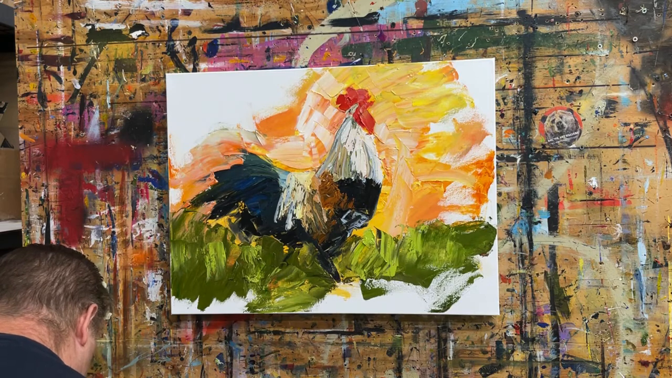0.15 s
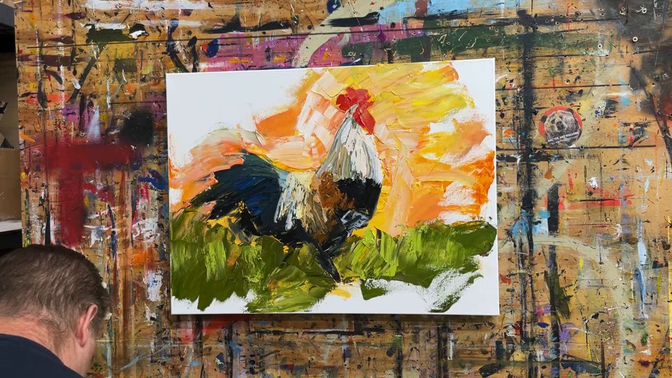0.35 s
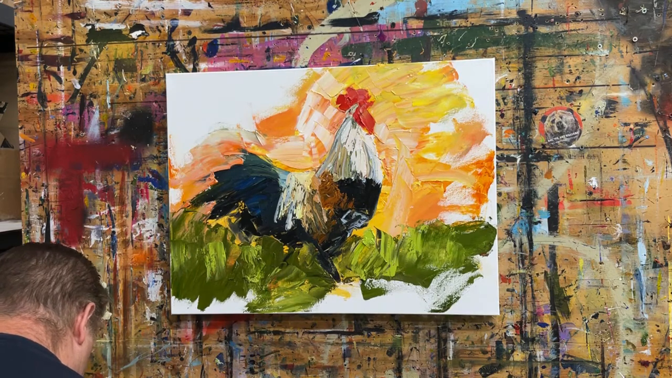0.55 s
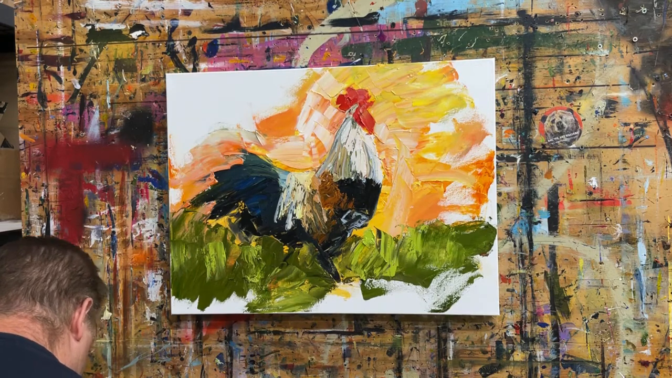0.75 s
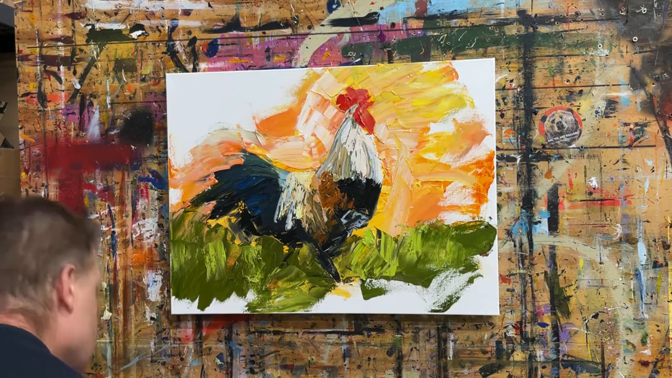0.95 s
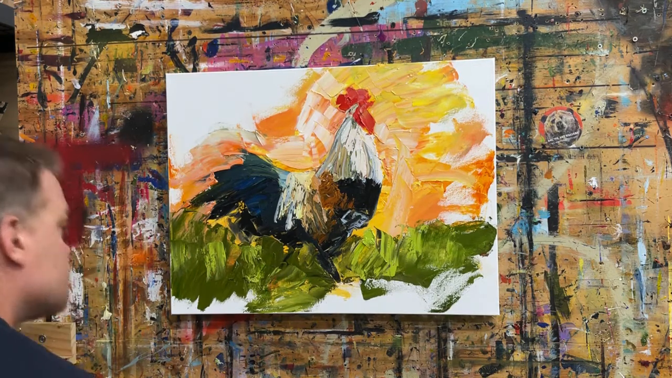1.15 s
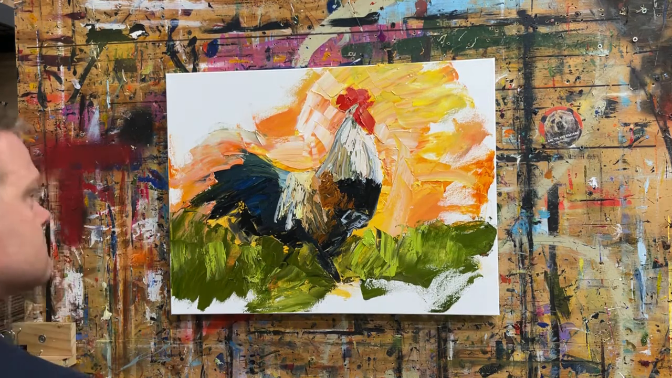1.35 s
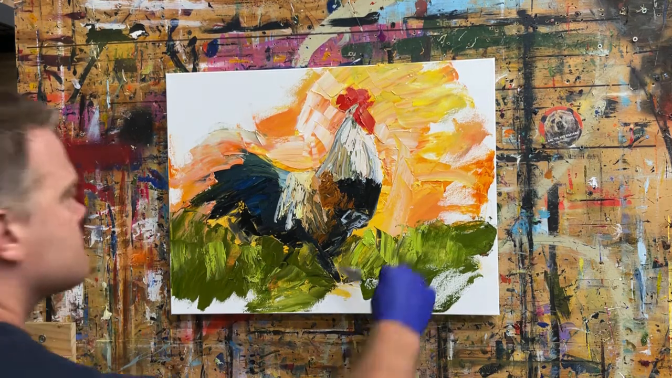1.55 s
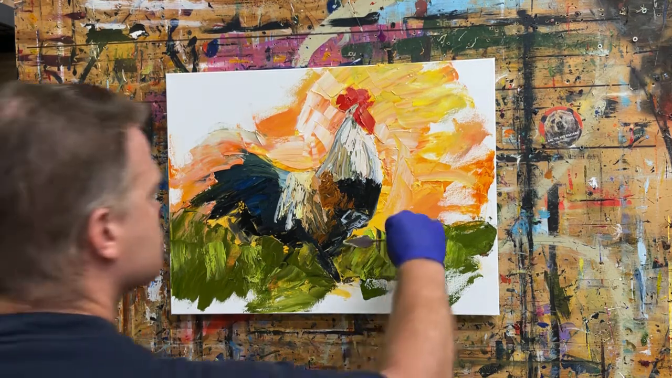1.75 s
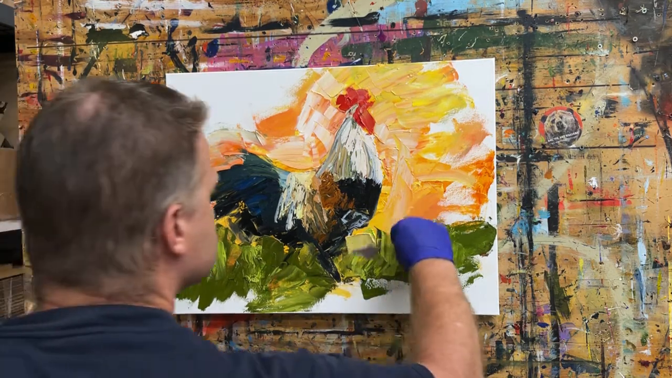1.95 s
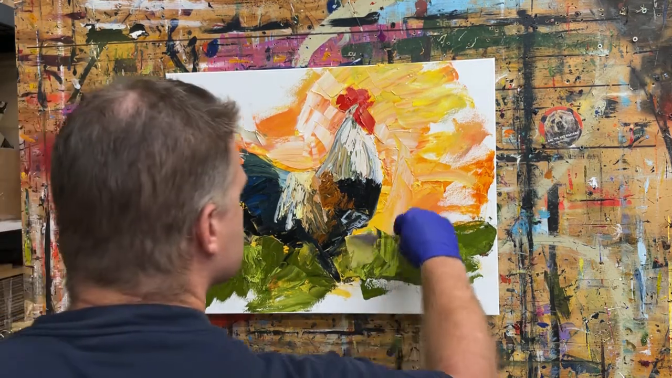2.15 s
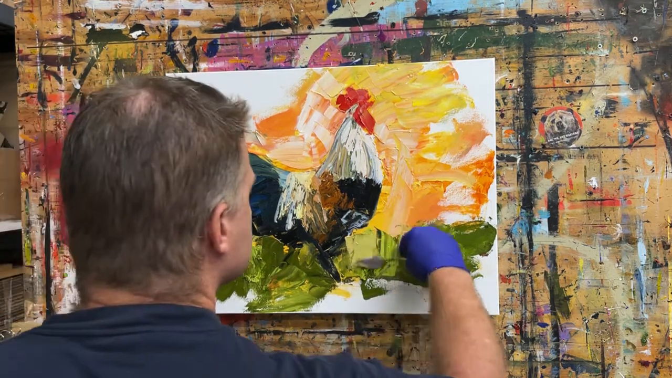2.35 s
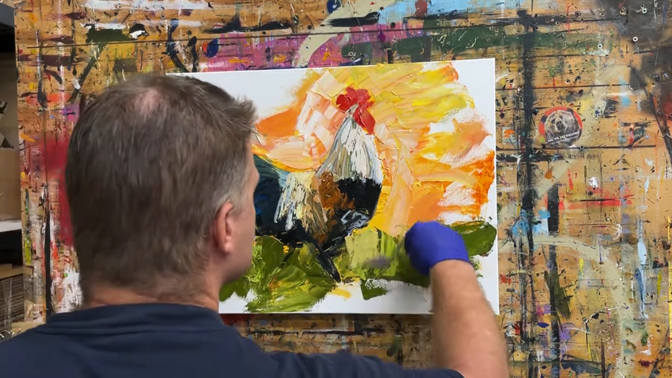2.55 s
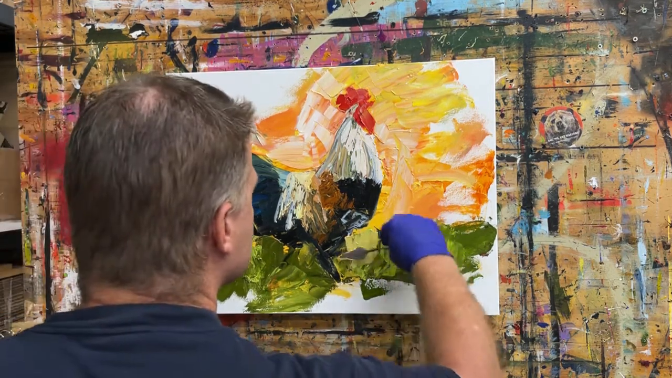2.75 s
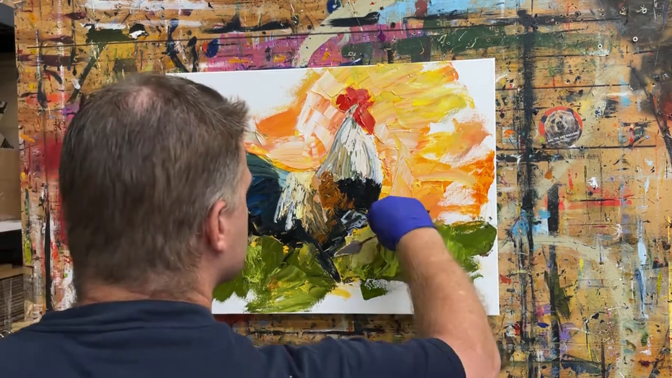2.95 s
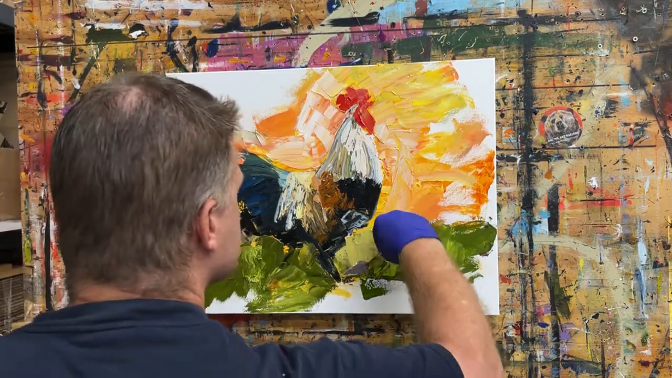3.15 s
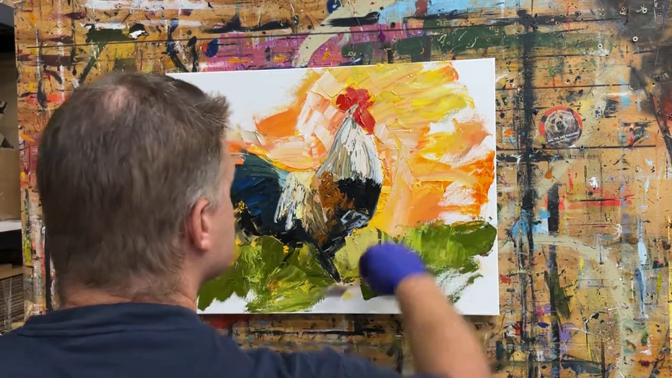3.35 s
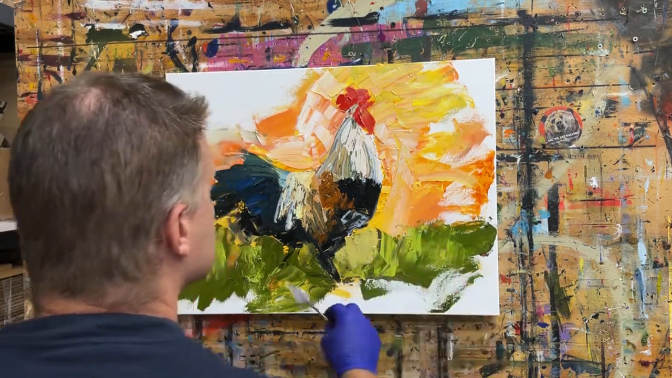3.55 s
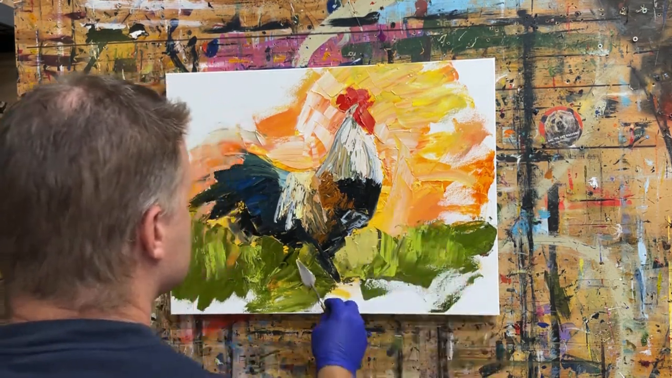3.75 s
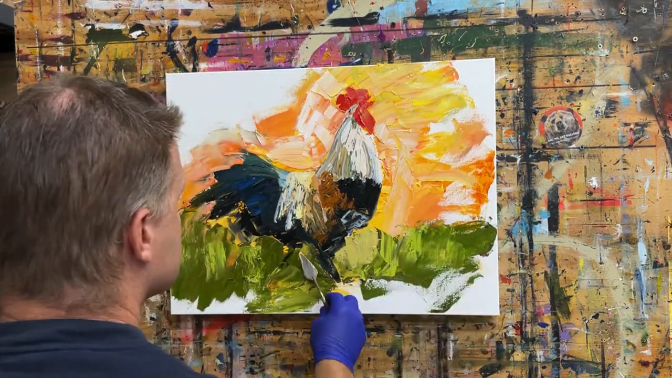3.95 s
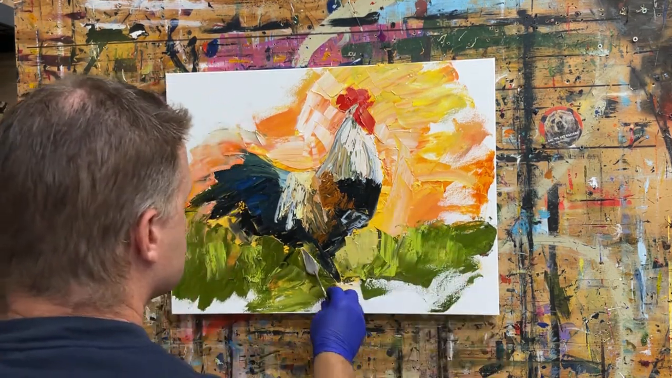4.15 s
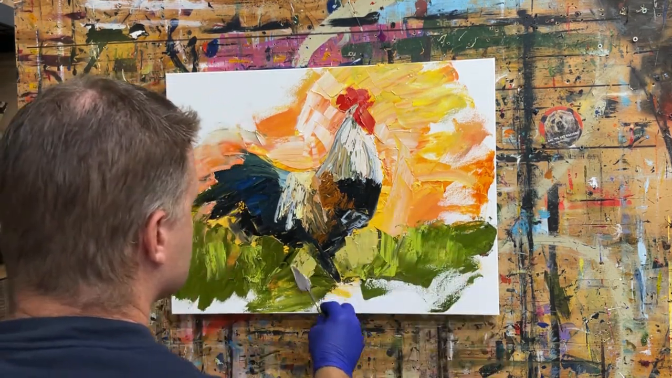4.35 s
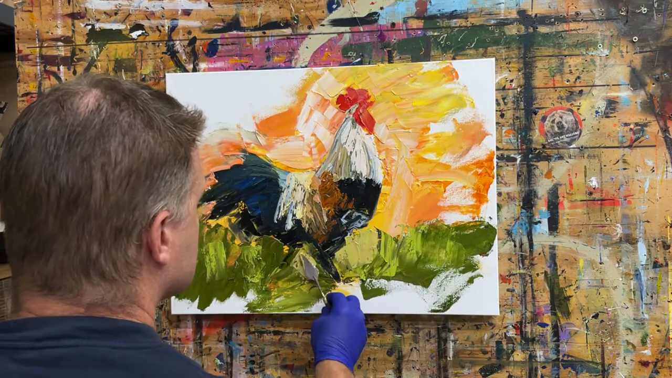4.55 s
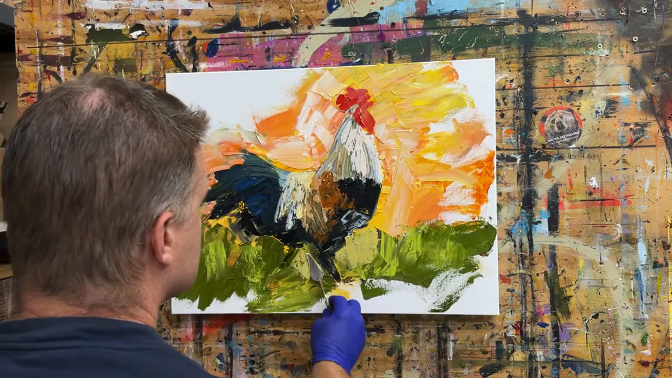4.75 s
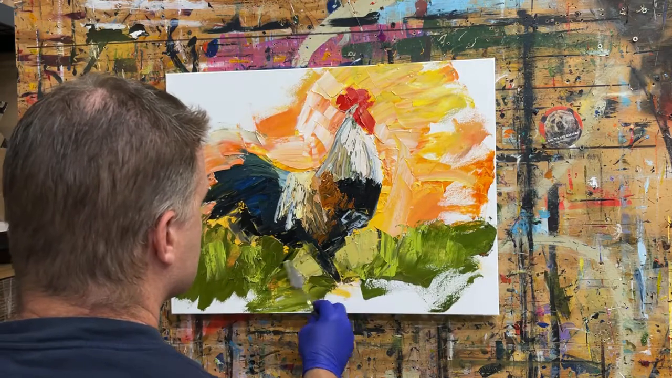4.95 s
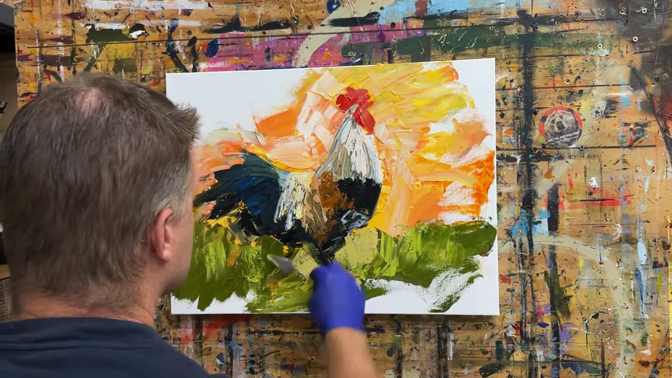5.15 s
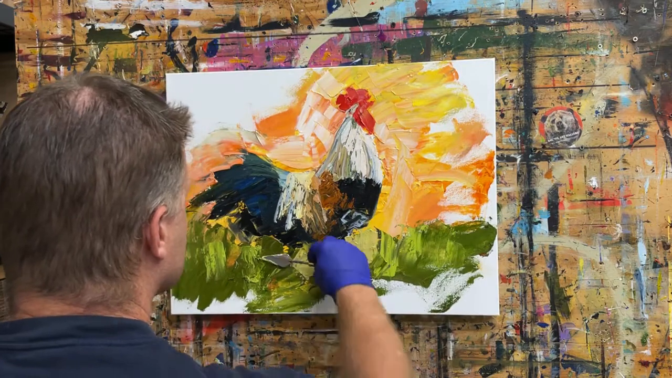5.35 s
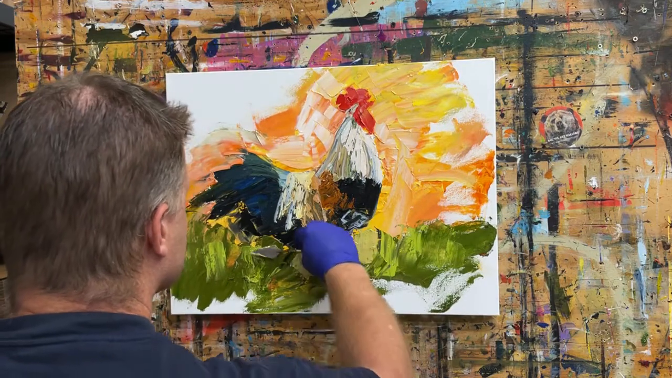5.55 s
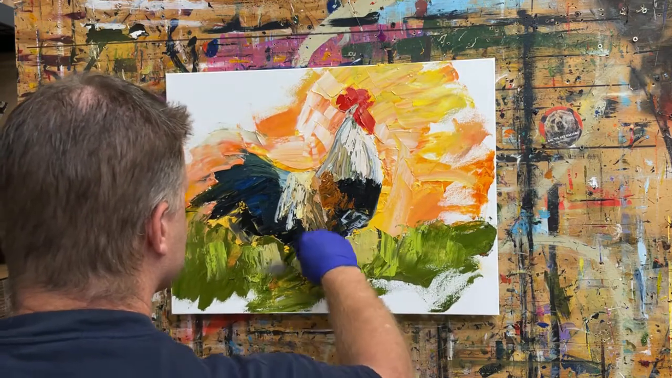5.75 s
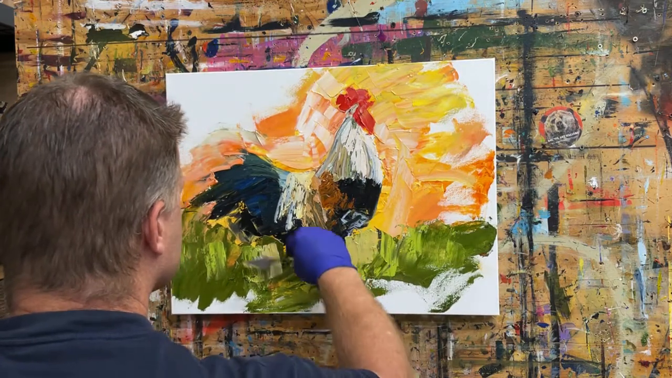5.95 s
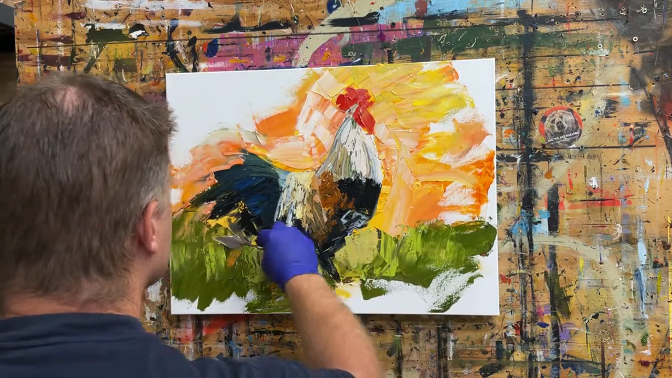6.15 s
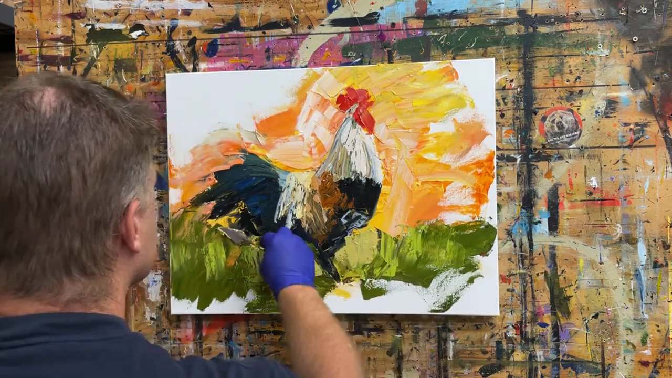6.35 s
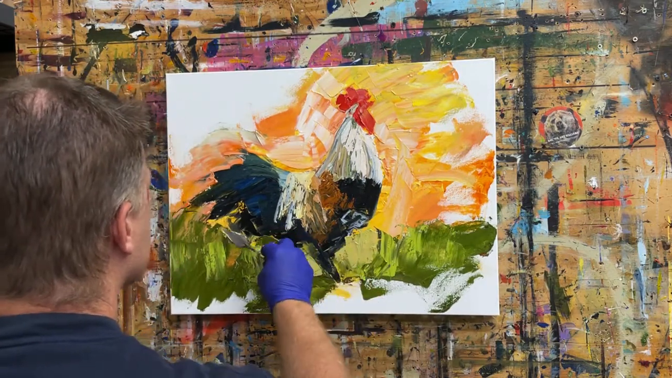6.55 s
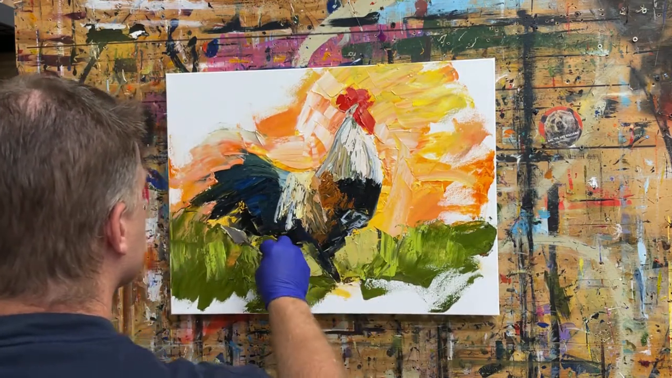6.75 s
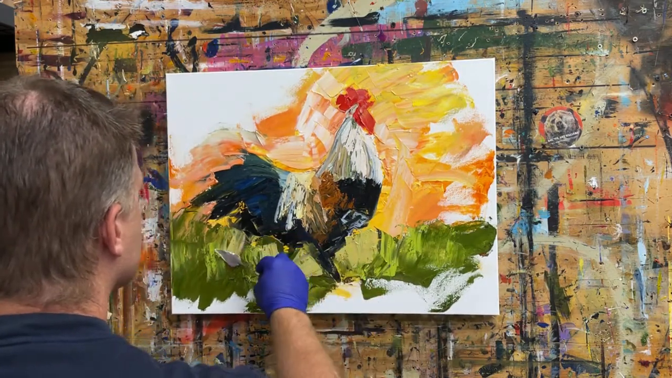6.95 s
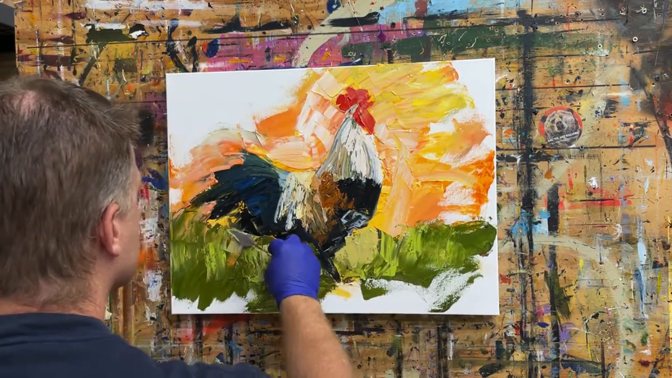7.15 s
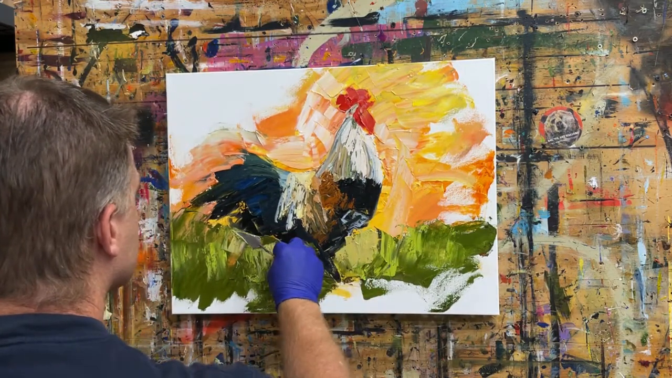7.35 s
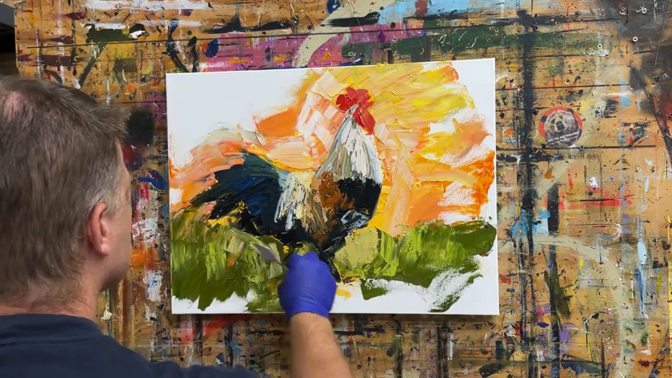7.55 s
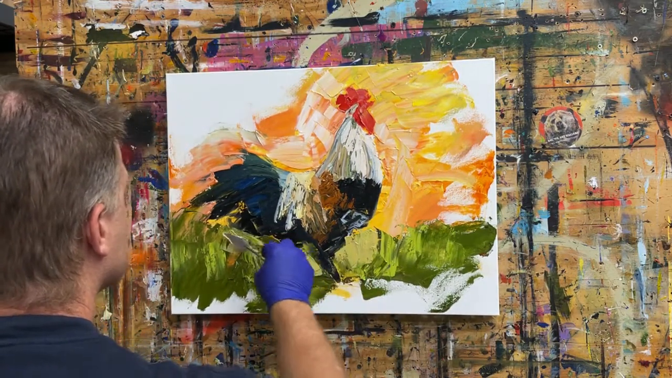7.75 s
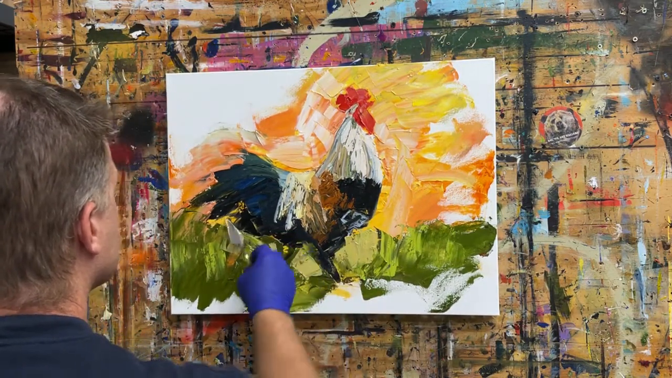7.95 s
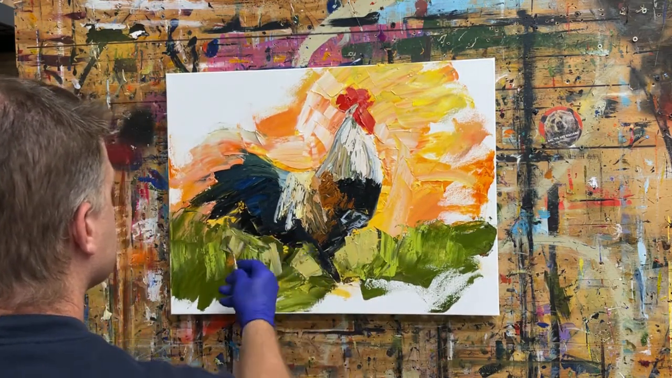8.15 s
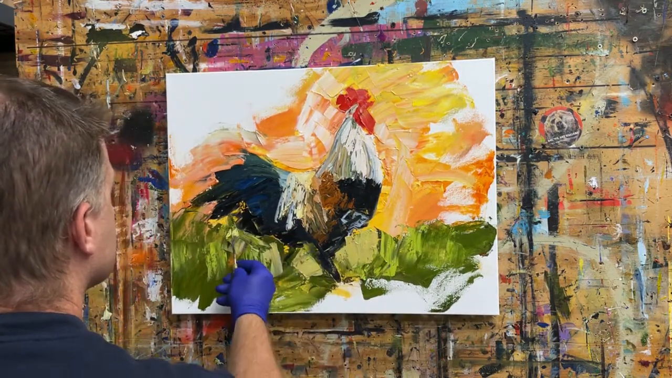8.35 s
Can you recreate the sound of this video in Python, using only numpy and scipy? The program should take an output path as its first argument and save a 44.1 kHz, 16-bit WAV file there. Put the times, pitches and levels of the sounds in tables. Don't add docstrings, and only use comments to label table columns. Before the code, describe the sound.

Soft, irregular muffled thumps on a taut canvas, with sparse dry clicks and faint sticky scrapes in a quiet studio with ventilation rumble.

```python
import sys
import numpy as np
from scipy import signal
from scipy.fft import rfft, irfft, next_fast_len
from scipy.io import wavfile
from scipy.ndimage import map_coordinates

SR = 44100
rng = np.random.default_rng(int(sys.argv[2]) if len(sys.argv) > 2 else 0)


def store_pcm(level_fs):
    pcm = np.round(np.clip(level_fs, -1, 1) * 32767).astype(np.int16)
    wavfile.write(sys.argv[1], SR, np.atleast_2d(pcm).T)


def nominal_scale(level):
    x = np.asarray(level, float) / 20
    return 10 ** x


N = 369858

# start_s, ring_db, contact_brightness_hz, first_swing_db
DABS = [(1.88, -22.5, 510, -23), (2.237, -26, 432, -27), (2.512, -29, 417, -29), (2.998, -26.5, 495, -25.5),
        (4.131, -27, 413, -27.5), (4.737, -24.5, 473, -25.5), (5.667, -27, 373, -36),
        (5.692, -31.5, 300, -33.5), (6.782, -29.5, 418, -37), (6.8172, -34, 338, -31.5),
        (7.315, -38, 416, -48.5), (7.339, -49, 343, -38), (8.205, -50.5, 1110, -61),
        (8.318, -40.5, 372, -38.5)]


def unit(x):
    return x / np.sqrt(np.mean(x ** 2) + 1e-20)


def along(points, hz):
    f, v = np.transpose(points)
    return np.interp(np.log(hz + 1), np.log(f + 1), v)


def wobble(rate):
    knots = rng.standard_normal(int(N * rate / SR) + 4)
    return map_coordinates(knots, [np.arange(N) * rate / SR])


def filtered(x, response):
    m = next_fast_len(x.shape[-1] + 8192)
    spectrum = rfft(x, m) * response(np.fft.rfftfreq(m, 1 / SR))
    return irfft(spectrum, m)[..., :x.shape[-1]]


def band(centre_hz, width_hz):
    return lambda f: (1j * f * width_hz / (centre_hz ** 2 - f * f + 1j * f * width_hz)) ** 2


def add(track, s, sound):
    part = track[..., round(s * SR):][..., :sound.shape[-1]]
    part += sound[..., :part.shape[-1]]


def rush(spectrum):
    # frequency_hz, likeness (0 to 1)
    likeness = [(30, 1), (150, 0.94), (400, 0.54), (1000, 0.15), (3000, 0.11), (12000, 0.21)]

    def shape(hz):
        turn = np.arccos(np.clip(along(likeness, hz), -1, 1)) / 2
        return nominal_scale(along(spectrum, hz)) * [np.cos(turn), np.sin(turn)]

    mid, side = filtered(rng.standard_normal((2, N)), shape)
    return unit(np.array([mid + side, mid - side]))


def air():
    # time_s, level_db
    strength = [(0.0, -58.5), (0.35, -53.5), (0.65, -61), (1.03, -56), (1.38, -56.5), (1.92, -56.5),
                (2.57, -53.5), (3.48, -57.5), (3.76, -54), (4.13, -56.5), (4.6, -56.5), (4.76, -48.5),
                (5.09, -57), (5.79, -52.5), (6.0, -54.5), (6.8, -55), (7.05, -54.5), (8.39, -57)]
    # frequency_hz, density_db (per Hz)
    rumble_spectrum = [(8.8, -54.5), (15, -22.5), (22, -22), (35, -10), (49, -6.5), (65, -1.5), (130, -13),
                       (170, -49), (290, -120)]
    # frequency_hz, density_db (per Hz)
    draught_spectrum = [(59, -31.5), (100, 0.5), (273, -9), (297, -14.5), (422, -19.5), (443, -37),
                        (482, -16), (512, -38.5), (537, -25), (614, -30.5), (736, -32), (903, -40.5),
                        (1800, -62.5), (2340, -56), (3960, -120)]
    # frequency_hz, density_db (per Hz)
    hiss_spectrum = [(500, -42.5), (1200, -1), (2500, -7.5), (5000, -11), (9000, -13), (12000, -15.5),
                     (16500, -3.5), (20000, -48)]
    rumble_db = np.interp(np.arange(N) / SR, *np.transpose(strength))
    rumble = nominal_scale(rumble_db + 2.5 * wobble(12)) * rush(rumble_spectrum)
    draught_db = -59 + 0.16 * (rumble_db - rumble_db.mean())
    draught = nominal_scale(draught_db + 1.5 * wobble(5)) * rush(draught_spectrum)
    return rumble + draught + nominal_scale(-90) * rush(hiss_spectrum)


def snaps():
    # start_s, crack_db, middle_db, knock_db, length_s
    breakages = [(.034, -60, -82, -70, 0.0078), (.059, -64, -61, -63, 0.0041),
                 (.102, -83, -54.5, -68, 0.008), (.440, -32, -47, -68, 0.0058),
                 (.665, -75, -51, -58, 0.011), (.725, -88, -48.5, -48, 0.021), (.892, -79, -38, -54, 0.036),
                 (.947, -41, -38.5, -56, 0.0058), (2.027, -60, -39, -41, .0076),
                 (2.546, -67, -41, -46, 0.0073), (3.571, -33, -41.5, -75, 0.0027),
                 (4.329, -47.5, -49, -42.5, 0.005), (5.063, -65, -86, -80, 0.0032),
                 (5.834, -39, -48, -36.5, 0.0022), (6.706, -86, -79, -65, .003),
                 (6.959, -66.5, -53.5, -39, .004), (7.194, -88, -82, -60, .003),
                 (7.535, -53, -57, -67.5, 0.0029), (7.553, -36, -47, -50.5, .0042),
                 (7.559, -29.5, -28.5, -35.5, 0.0042), (7.593, -70, -57, -54, 0.0031)]
    touch_db, touch_s = (-37.5, -41, -31.5), .003
    pan_db, knock_lag_s = -3.5, .0015
    out, knocks, t = np.zeros((2, N)), np.zeros(N), np.arange(SR // 10) / SR
    sweep = 2 * np.pi * (310 * t + 420 * .003 * (1 - np.exp(-t / 0.003)))
    knock = np.sin(sweep) * nominal_scale(-60 * t / 0.022) * (1 - np.exp(-t / 0.0014)) ** 2
    touches = [(s, *np.add(db, touch_db), touch_s) for s, db, *_ in DABS]
    for s, crack_db, middle_db, knock_db, length_s in breakages + touches:
        breaks = 0.22 * rng.standard_normal(len(t)) * np.exp(-2 * t / length_s)
        breaks[0] = .6
        crack = nominal_scale(crack_db) * filtered(breaks, band(10800, 15000))
        tick = nominal_scale(middle_db) * filtered(breaks, band(1500, 2800))
        add(out, s, (crack - tick) * nominal_scale([[pan_db / 2], [-pan_db / 2]]))
        add(knocks, s + knock_lag_s, nominal_scale(knock_db + 4) * knock)
    return out, knocks


def effort(t, swell_s, hold_s, fade_db_per_s):
    return nominal_scale(-18 * np.maximum(-t, 0) / swell_s - fade_db_per_s * np.maximum(t - hold_s, 0))


def rubs():
    # peak_s, swell_s, hiss_db, scrape_db, scrape_hz
    strokes = [(.73, .02, -86, -70, 2780), (.8, 0.014, -75.5, -78, 2180), (0.901, 0.02, -67, -62, 2080),
               (0.946, 0.034, -62, -77, 2600), (1.136, 0.033, -101, -82.5, 2470),
               (1.2, 0.086, -97, -72, 3300), (1.262, 0.11, -70, -66.5, 1720),
               (2.038, 0.059, -87, -75.5, 1800), (2.55, 0.021, -77, -83, 2400),
               (3.097, 0.039, -69.5, -63.5, 2340), (3.336, 0.058, -82.5, -78, 1370),
               (5.746, 0.008, -69, -66, 2770), (6.842, 0.03, -73.5, -72.5, 1830),
               (6.96, .02, -95, -76, 1500), (7.336, 0.012, -81, -80, 1390), (7.575, 0.022, -73, -58, 1190),
               (8.226, 0.07, -91, -71, 610), (8.337, 0.046, -90, -94, 1800)]
    smear_hiss_db, smear_scrape_db, smear_hz = -51.5, -50.5, 1500
    smear_swell_s, smear_hold_s = 0.0039, 0.042
    hiss_fade, scrape_fade = 333, 217
    peel_speed = 2.2
    clumps = nominal_scale(1.2 * wobble(70) + 3.5 * wobble(400))
    grains = np.pad(clumps * rng.standard_normal(N), SR)
    out, t = np.zeros(N + SR), np.arange(-SR // 4, SR // 3) / SR

    def bright(f):
        return band(8800, 7000)(f) + nominal_scale(4.5) * band(5700, 320)(f)

    smears = [(s, smear_swell_s, smear_hold_s, 1, db + smear_hiss_db, db + smear_scrape_db, smear_hz)
              for s, db, *_ in DABS]
    peels = [(s, swell_s, 0, peel_speed, *rest) for s, swell_s, *rest in strokes]
    for s, swell_s, hold_s, fast, hiss_db, scrape_db, hz in smears + peels:
        piece = grains[round((s + 1 + t[0]) * SR):][:len(t)]
        hiss = nominal_scale(hiss_db) * unit(filtered(piece, bright))
        hiss = hiss * effort(t, swell_s, hold_s, fast * hiss_fade)
        scrape = nominal_scale(scrape_db) * unit(filtered(piece, band(hz, 1.13 * hz)))
        scrape = scrape * effort(t, swell_s, hold_s, fast * scrape_fade)
        add(out, s + t[0], nominal_scale(-7.5) * (hiss + scrape))
    return out[:N]


def dabs():
    # frequency_hz, level_db, t60_s
    canvas_modes = [(71.6, -6.5, 0.12), (108.9, -19.5, 0.23), (136.4, -6, 0.053), (155, -15, 0.16),
                    (191, -18, 0.28), (240.2, -8.5, 0.17), (289, -7.5, 0.16), (371, -2, 0.099),
                    (421.6, -2, 0.072), (519.6, -13, 0.24), (560.2, -13, 0.14), (626.7, -11.5, 0.093),
                    (769, -17.5, 0.089), (834, -30, 0.2), (1075, -22, 0.07)]
    out, t = np.zeros(N), np.arange(SR // 2) / SR
    hz, level_db, t60_s = np.transpose(canvas_modes)[:, :, None]
    sign = np.where(hz < 215, 1, -1)
    envelope = nominal_scale(level_db - 60 * t / t60_s) * (1 - np.exp(-t * hz / 0.5)) ** 3
    modes = envelope * sign * np.sin(2 * np.pi * hz * t)
    modes = modes * (1 - .6 * np.exp(-t / .009))
    late = t - .0112
    swing = -np.cos(2 * np.pi * 152 * late) * np.exp(-(late / .0055) ** 2)
    spot = rng.standard_normal((len(DABS), len(canvas_modes), 1))
    weave = unit(filtered(rng.standard_normal((len(DABS), len(t))), band(750, 710)))
    weave = weave * nominal_scale(-37 - 60 * t / 0.16) * (1 - np.exp(-t / 0.0095))
    for (s, ring_db, bright_hz, swing_db), place, rattle in zip(DABS, spot, weave):
        contact = nominal_scale(1.17 * place) / (1 + (hz / bright_hz) ** 2)
        ring = np.sum(contact * modes, axis=0) + rattle
        add(out, s, nominal_scale(ring_db + 1.5) * ring + nominal_scale(swing_db) * swing)
    return out


def studio(x, wet_db, early_db, late_db, rise_s):
    # frequency_hz, t60_s
    decay = [(60, 0.49), (160, 0.24), (420, 0.25), (1100, 0.28), (3000, 0.24), (8000, 0.19), (14000, 0.15)]
    # delay_s, level_db
    walls = [
        (.0021, -19.5),
        (.0047, 5.5),
        (.0068, -5.5),
        (.0112, -18.5),
        (.0135, -20),
        (.0261, -2.5),
        (.0381, -10),
    ]
    hz, t, z = signal.stft(rng.standard_normal((2, SR // 2)), SR, nperseg=512)
    fading = z * nominal_scale(-60 * t / along(decay, hz)[:, None])
    mid, side = signal.istft(fading, SR, nperseg=512)[1]
    side = filtered(side, lambda f: f / (f + 500))
    build_up = (1 - np.exp(-np.arange(len(mid)) / SR / rise_s)) ** 2
    tail = np.array([mid + side, mid - side]) * build_up
    answer = nominal_scale(wet_db) * tail / np.linalg.norm(tail[0])
    answer[:, 0] = 1
    for k, (s, db) in enumerate(walls):
        right_lag = k % 2 * np.array([0, 2])
        group_db = early_db if s < .02 else late_db
        answer[[0, 1], round(s * SR) + right_lag] += nominal_scale(db + group_db) / 2
    return signal.fftconvolve(x * np.ones((2, 1)), answer, axes=1)[:, :N]


def scene():
    # frequency_hz, left_over_right_db
    lean = [(250, 0.5), (500, 2.5), (1000, 5.5), (4000, 5), (8000, 3.5), (12000, 2)]
    background = air()
    cracks, knocks = snaps()
    ticks = studio(cracks, wet_db=-5.0, early_db=-4.0, late_db=-12, rise_s=0.00043)
    ticks = ticks + studio(knocks, wet_db=-3.5, early_db=-14, late_db=-11, rise_s=0.0027)
    strokes = studio(rubs(), wet_db=-7.5, early_db=-18.5, late_db=-14, rise_s=0.017)
    canvas = studio(dabs(), wet_db=-7, early_db=-20, late_db=0, rise_s=.025)
    sources = canvas + ticks + strokes
    return filtered(sources, lambda hz: nominal_scale(along(lean, hz) * [[.5], [-.5]])) + background


def roll_off(x):
    return signal.sosfilt(signal.butter(12, 16700, fs=SR, output="sos"), x)


def record(dry):
    # frequency_hz, gain_db
    port_gain = [(20, 1.5), (5500, 3.5), (7200, 5), (9000, 12), (9700, 5), (10300, -2.5), (10800, 9),
                 (11400, 14.5), (12300, 5.5), (13600, -12.5), (15200, -5.5), (15900, -8), (16300, -40),
                 (22000, -17)]
    lead_s = .00003

    def ports(hz):
        return nominal_scale(along(port_gain, hz)) * np.exp(1j * np.pi * hz * lead_s * [[1], [-1]])

    return roll_off(filtered(dry, ports))


dry = scene()
out = record(dry)
store_pcm(out)
```